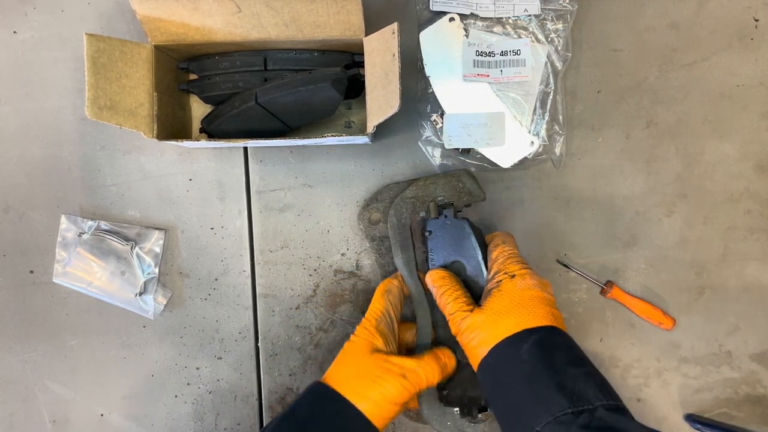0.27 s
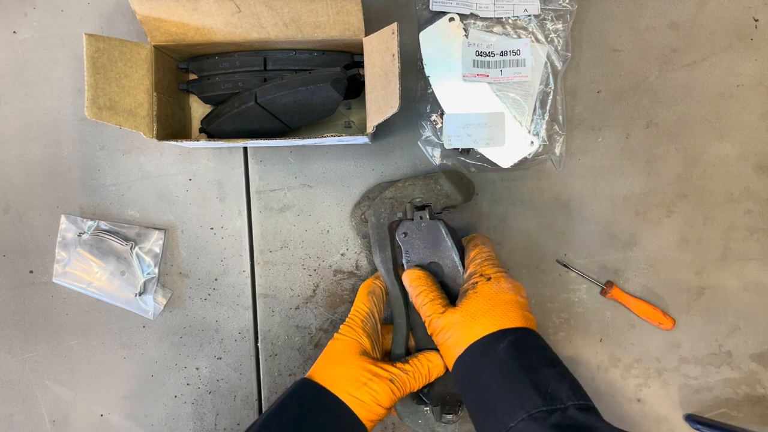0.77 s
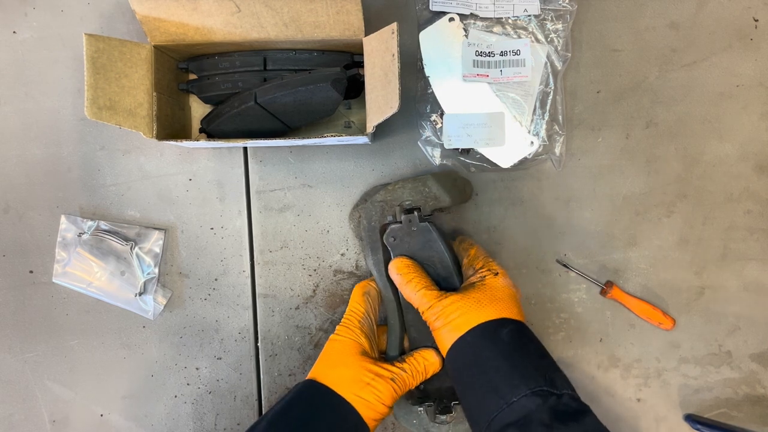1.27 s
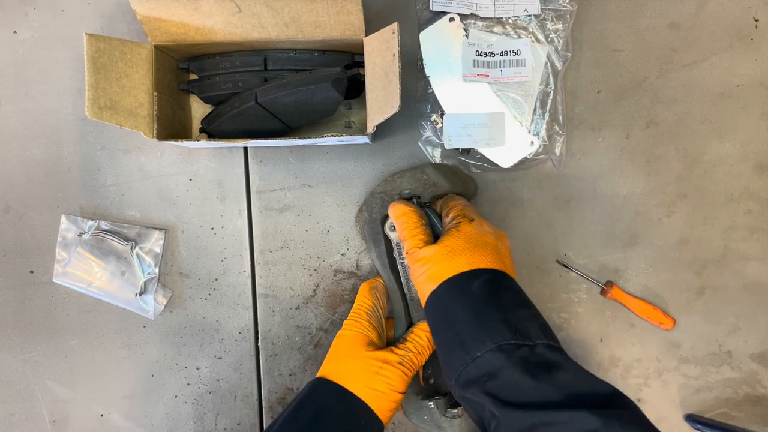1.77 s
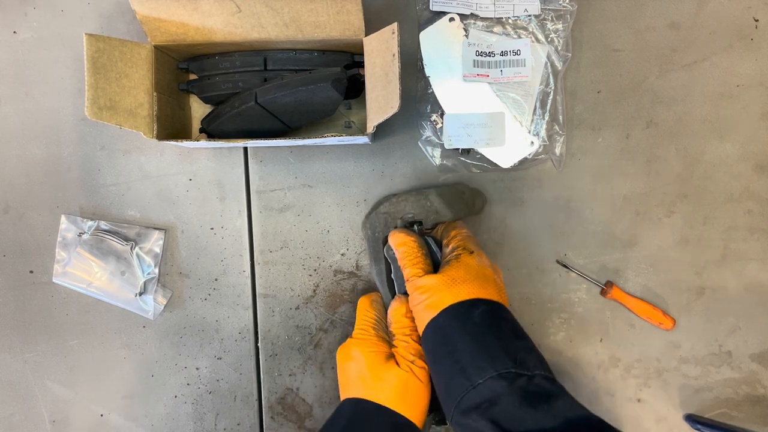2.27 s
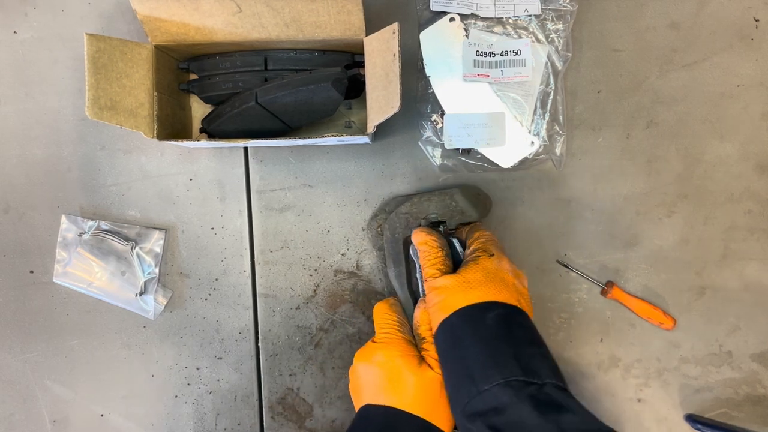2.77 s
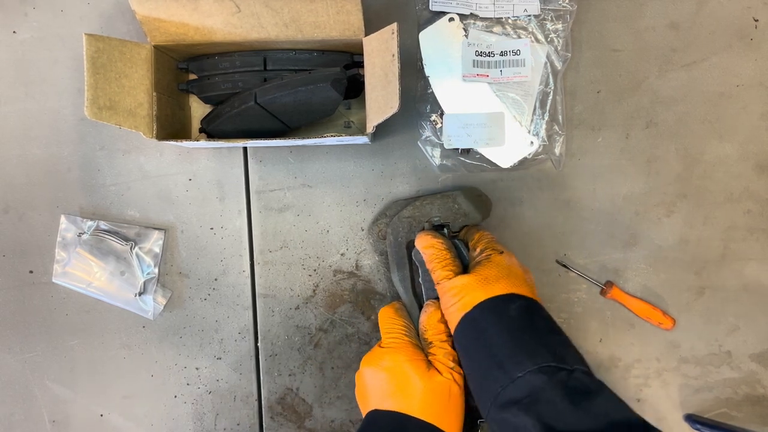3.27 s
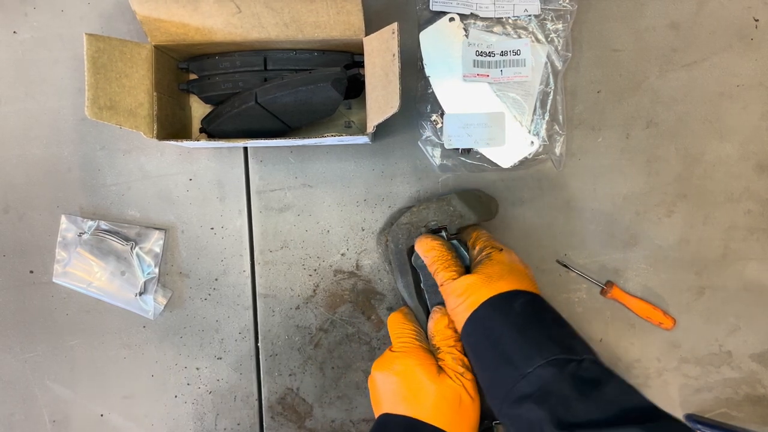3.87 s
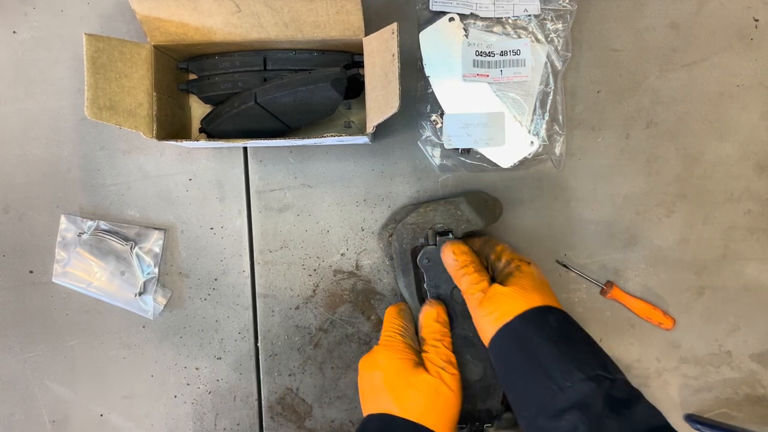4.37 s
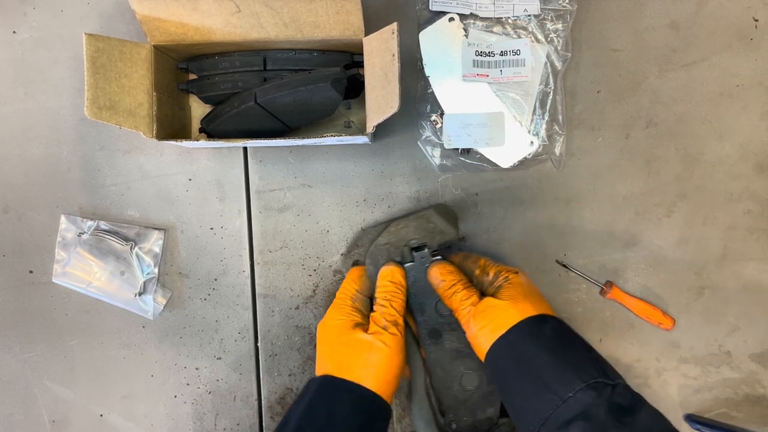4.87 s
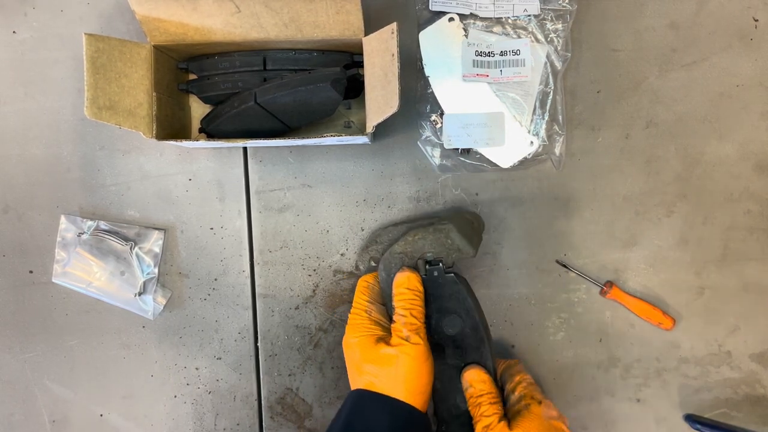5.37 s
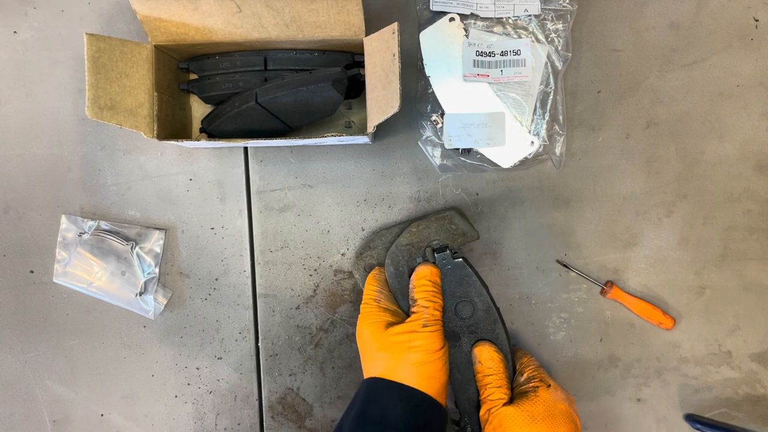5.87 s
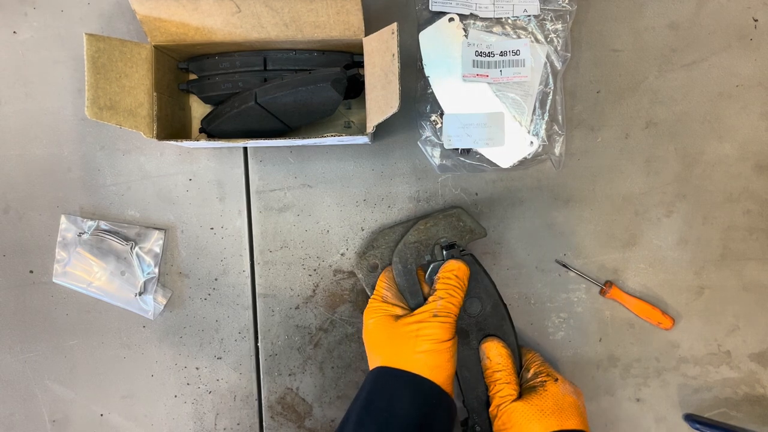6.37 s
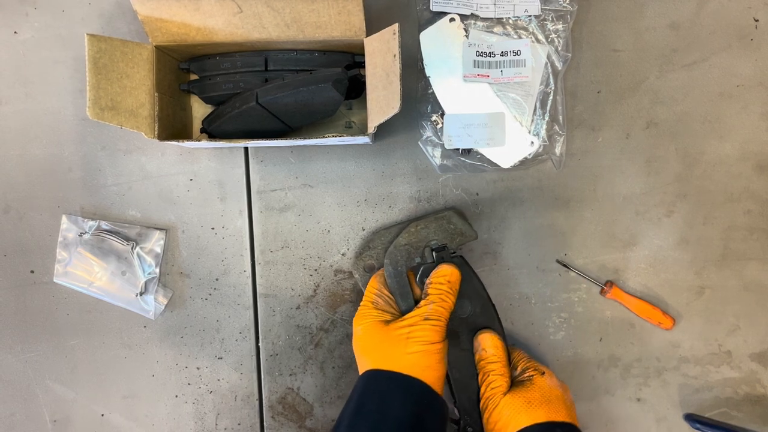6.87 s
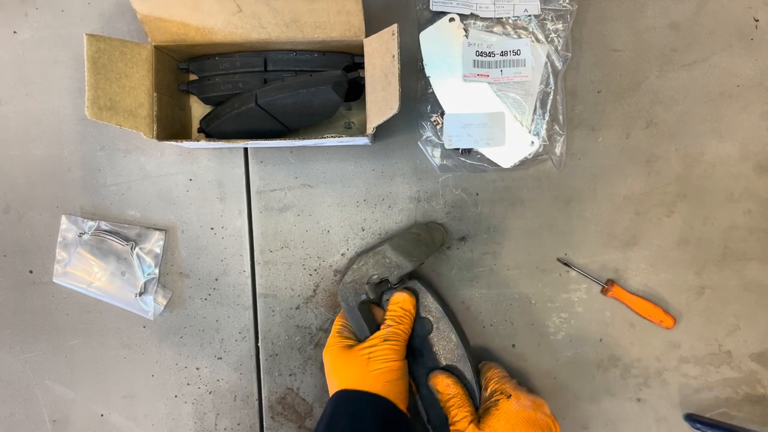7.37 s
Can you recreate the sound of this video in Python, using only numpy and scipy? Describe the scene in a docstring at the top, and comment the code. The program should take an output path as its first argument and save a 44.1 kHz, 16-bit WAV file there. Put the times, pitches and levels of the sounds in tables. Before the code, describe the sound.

In a garage, a steel brake pad is worked into a cast bracket on a hard surface. Gritty scraping and faint squeaky rubs run over a quiet room hum, with light knocks first, then heavier low thumps and metal ticks. A bright clack comes midway, and a rapid hard clatter just after seven seconds. Heard closely in stereo with a soft room echo.

```python
"""A steel brake pad is worked into a cast caliper bracket that lies on a work surface in a garage.
From the start steel and gloves scrape over still-room noise: grains of noise rasp and shake the surface,
some rubs sing as narrow bands, and swipes swell. Light knocks come first, then heavier thumps from 1.4 s,
as decaying surface modes under gritty noise; edges tick and the plate rings, as noise cracks with modes.
A harder clatter comes just after 7 s. A close pair of microphone ports hears it with the garage's echo."""
import sys
import numpy as np
from scipy import signal
from scipy.fft import rfft, irfft, next_fast_len
from scipy.io import wavfile
from scipy.ndimage import uniform_filter1d

SR = 44100
rng = np.random.default_rng(int(sys.argv[2]) if len(sys.argv) > 2 else 0)


def digitize_waveform(pressure):
    """Quantize a signal to 16-bit integers and store it at the path in sys.argv[1].

    Rows of a 2-D input are taken as channels; values are limited to [-1, 1].
    """
    field = np.atleast_2d(pressure).T
    bounded = np.clip(field, -1, 1)
    quanta = np.round(bounded * 32767).astype(np.int16)
    wavfile.write(sys.argv[1], SR, quanta)


N = 336262

# Modes of the work surface, shared by thumps and sliding.
# Each row: nominal frequency in hertz, relative level in dB, decay time as a share of the sound's t60.
SURFACE_MODES = [(52, -38.5, 0.37), (74.5, -15, 0.61), (88.6, 1.5, 0.61), (105.5, 2, 0.73), (127.6, 5, 0.4),
                 (145, 2, 0.63), (164.9, -4, 0.7), (208.9, -10.5, 0.83), (245.7, -4.5, 1.02),
                 (271.7, 5.5, 0.51), (326.6, -3.5, 1.1), (356, -1.5, 0.54), (435.4, -7.5, 1.2),
                 (501.4, -4.5, 1.1), (580, -11.5, 0.87), (751, -17, 2.4), (910, -1.5, 0.44),
                 (994, -11.5, 0.37)]


def amp(db):
    """Level law: 20 dB is a factor of ten in amplitude."""
    return 10 ** (np.asarray(db) / 20)


def evened(x):
    """Normalisation to unit root-mean-square amplitude."""
    return x / np.sqrt(np.mean(x ** 2) + 1e-20)


def read(points, hz):
    """Interpolation of a frequency curve along a logarithmic frequency axis."""
    f, value = np.transpose(points)
    return np.interp(np.log(hz + 1), np.log(f + 1), value)


def add(mix, s, sound):
    """Superposition: adds a sound to the mix from s seconds on."""
    part = mix[round(s * SR):][:len(sound)]
    part += sound[:len(part)]


def shaped(x, gain):
    """Linear filtering: multiplies the spectrum by a gain given as a function of hertz."""
    size = next_fast_len(x.shape[-1])
    spectrum = rfft(x, size) * gain(np.fft.rfftfreq(size, 1 / SR))
    return irfft(spectrum, size)[..., :x.shape[-1]]


def rings(t, hz, db, t60):
    """Modal superposition: a sum of exponentially decaying sines, each silent before its time zero."""
    t = np.maximum(t, 0)
    modes = amp(db - 60 * t / t60) * np.sin(2 * np.pi * hz * t)
    return modes.sum(0)


def resonate(x, hz, width_hz):
    """Resonance by heterodyning: shifts hz to zero, smooths with unit gain, and shifts back."""
    turn = np.exp(2j * np.pi * hz * np.arange(len(x)) / SR)
    pole = np.exp(-np.pi * width_hz / SR)
    return 2 * (turn * signal.lfilter([1 - pole], [1, -pole], x / turn)).real


def patchy(x, depth_db):
    """Time-varying spectrum: colour drifts in patches as different spots of the faces touch."""
    z = signal.stft(x, nperseg=512, noverlap=384)[2]
    across_hz = uniform_filter1d(rng.standard_normal(z.shape), 9, axis=0)
    patches = evened(uniform_filter1d(across_hz, 14, axis=1))
    return signal.istft(z * amp(depth_db * patches), nperseg=512, noverlap=384)[1][:len(x)]


def contact(x, tilt_db):
    """Spectral colour of steel contact, tilted by tilt_db per octave about 3 kHz."""
    # Colour of steel contact noise. Each row: frequency in hertz, relative level in dB.
    contact_colour = [(200, 3), (600, 1), (1200, 1), (2000, 2), (3200, 2), (5200, -2.5), (7500, -7),
                      (10500, -7), (13500, -14), (16500, -14.5)]
    return shaped(x, lambda hz: amp(read(contact_colour, hz) + tilt_db * np.log2((hz + 100) / 3000)))


def still_air():
    """Stationary random noise: the still room has a fixed spectrum and a steady level."""
    # Spectrum of the still room. Each row: frequency in hertz, relative level in dB per hertz.
    air_spectrum = [(15, -44.5), (25, -13), (92, 36.5), (256, 27.5), (575, -65), (2840, 5.5), (5280, -59),
                    (7510, -62), (10100, -27), (16000, -70.5)]
    noise = shaped(rng.standard_normal(N), lambda hz: amp(read(air_spectrum, hz)))
    return amp(-59.5) * evened(noise)


def garage(x):
    """Reverberation: taps of random sign decay band by band; the ports differ most in the middle range."""
    # Decay of the garage. Each row: frequency in hertz, t60 in seconds.
    garage_decay = [(80, 0.44), (250, 0.74), (1000, 0.44), (3000, 0.47), (8000, 0.36), (16000, 0.17)]
    taps = np.zeros((2, SR))
    at = np.arange(200, SR - 20, 20) + rng.integers(0, 20, (2, (SR - 201) // 20))
    np.put_along_axis(taps, at, rng.choice([-1., 1.], at.shape), 1)
    hz, t, z = signal.stft(taps, SR, nperseg=512)
    octaves = np.log2((hz[:, None] + 1) / 1700)
    apart = np.clip(.9 * np.exp(-(octaves / 2.2) ** 2), 0, 1)
    z = np.array([z[0], np.sqrt(1 - apart ** 2) * z[0] + apart * z[1]])
    fade = amp(-60 * t / read(garage_decay, hz)[:, None])
    tail = signal.istft(z * fade, SR, nperseg=512)[1]
    return signal.fftconvolve(x[None], tail / np.linalg.norm(tail[0]), axes=1)[:, :N]


def slide():
    """Friction of rough faces: dense grains rasp, and lumpy forcing shakes the surface modes."""
    # Course of the sliding, interpolated between rows. Each row: time in seconds, level of the rumble
    # in the surface in dB, level of the rasp in dB, sharpness from 0 (dull drag) to 1 (scratch).
    slide_course = [(0.0, -51.5, -53.5, 0.033), (0.27, -48, -59.5, 0.58), (0.85, -52.5, -101, 0.37),
                    (1.34, -50, -51.5, 0.53), (1.75, -50.5, -81.5, 1), (2.14, -66, -70.5, 0.17),
                    (2.74, -43.5, -61.5, .2), (3.29, -41, -67, 0.098), (3.73, -47.5, -59.5, .1),
                    (4.0, -40, -108, 0.93), (4.35, -47.5, -55, 0.22), (4.82, -43.5, -52.5, 0.37),
                    (5.45, -62, -71, 1), (5.75, -45, -57, 0.048), (6.42, -58, -63, 0.12),
                    (6.9, -50.5, -53.5, .1), (7.19, -30, -44, 0.053), (7.5, -48, -53.5, 0.37)]
    s, *columns = np.transpose(slide_course)
    rumble_db, rasp_db, sharp = (np.interp(np.arange(N) / SR, s, c) for c in columns)

    catches = evened(uniform_filter1d(rng.standard_normal(N), 500))  # stick and slip
    grain_db = 2.5 * np.minimum(rng.exponential(1, N), 4) + 1.3 * catches
    grains = patchy(rng.standard_normal(N) * amp(grain_db), 4.8)
    bright = np.clip(sharp, 0, 1)
    drag, scratch = evened(contact(grains, -6.0)), evened(contact(grains, 1.0))
    rasp = (1 - bright) * drag + bright * scratch

    t = np.arange(SR // 4) / SR
    hz, db, share = np.transpose(SURFACE_MODES)[:, :, None]
    response = rings(t, hz, db - 10.8 * np.log2(hz / 100), 0.43 * share)
    rocking = evened(uniform_filter1d(rng.standard_normal(N), 1500))  # the parts rock as they drag
    bumps = rng.standard_normal(N) * amp(4.8 * rocking)
    rumble = evened(signal.oaconvolve(bumps, response)[:N])
    return amp(rumble_db) * rumble + amp(rasp_db) * rasp


def swipe(length, db, tilt_db):
    """Broadband friction: contact noise of glove or steel under a brief swell."""
    count = round(length * SR)
    noise = contact(rng.standard_normal(SR // 4), tilt_db)[:count]
    return amp(db) * evened(noise) * signal.windows.tukey(count, .7)


def squeak(length, hz, db):
    """Resonant friction: uneven slips excite one band while the rub swells and fades."""
    width_hz = 400  # of each of two resonances in series
    count = round(length * SR)
    noise, slips = rng.standard_normal((SR // 2, 2))[:count].T
    drive = noise * amp(6.4 * evened(uniform_filter1d(slips, 300)))
    band = resonate(resonate(drive, hz, width_hz), hz, width_hz)
    return amp(db) * evened(band) * np.hanning(count)


def click(modes, db, tilt_db, pitch_hz, focus_db, ring_db, grip_db):
    """Impact with damping: a crack with a gritty wake excites modes near a pitch; grip speeds their decay."""
    t = np.arange(SR // 3) / SR
    hz, mode_db, t60 = np.transpose(modes)[:, :, None]
    onset = np.minimum(t / 0.00071, 1)
    wake = amp(-60 * t / .009) + amp(-13. - 60 * t / .04)
    crack = contact(rng.standard_normal(len(t)), tilt_db) * wake * onset
    struck_db = mode_db - abs(focus_db * np.log2(hz / pitch_hz))  # focus in dB per octave off the pitch
    gripped_t60 = 1 / (1 / t60 + amp(grip_db))
    ring = rings(t, hz, struck_db, gripped_t60)
    return amp(db) * (1.155 * crack / abs(crack).max() + amp(ring_db) * ring * onset)


def tick(db, tilt_db, pitch_hz):
    """Impact on a cast body: an edge catches the bracket and excites its short-lived modes."""
    # Modes of the cast bracket.
    # Each row: frequency in hertz, relative level in dB, t60 in seconds when free.
    bracket_modes = [(775, -6, 0.043), (910, -7.5, 0.031), (1066, -2, 0.041), (1397, -5.5, 0.026),
                     (1645, -0.5, 0.017), (1943, -5.5, 0.045), (2234, -8, 0.015), (2884, -3, 0.082),
                     (3410, -15.5, 0.075), (3850, -23.5, 0.033)]
    return click(bracket_modes, db, tilt_db, pitch_hz, focus_db=8., ring_db=-5., grip_db=26.)


def strike(db, pitch_hz, focus_db, grip_db):
    """Impact on a plate: the pad's steel takes a blow and rings as its grip allows."""
    # Modes of the pad's plate.
    # Each row: frequency in hertz, relative level in dB, t60 in seconds when free.
    pad_modes = [(620, -6, .1), (1690, -1, .1), (1995, 0, .1), (3115, -9, .12), (3850, -12, .03),
                 (5210, -4, .35), (6090, -22, .12), (10000, -14, .02), (11500, -8, .02), (12620, -18, .04)]
    return click(pad_modes, db, 8.5, pitch_hz, focus_db, ring_db=-3, grip_db=grip_db)


def thump(db, pitch_hz, grit_db):
    """Dispersion of bending waves: surface modes near the pitch ring, low ones late, with grit on top."""
    t = np.arange(SR // 2) / SR
    t60 = 0.19 * (153.5 / pitch_hz) ** 0.36  # 0.19 s at 153.5 Hz; lower knocks ring longer
    hz, mode_db, share = np.transpose(SURFACE_MODES)[:, :, None]
    late = t - 0.0589 / np.sqrt(hz) + .002
    rise_db = 20 * np.log10(1 - np.exp(-np.maximum(late, 0) * hz * 0.57) + 1e-9)
    octaves = np.log2(hz / pitch_hz)
    near_db = -11. * np.maximum(octaves, 0) + 3.4 * np.minimum(octaves, 0)
    varied_hz = hz * rng.normal(1, 0.034, hz.shape)
    body = rings(late, varied_hz, mode_db + near_db + rise_db, t60 * share)

    grit = evened(patchy(contact(rng.standard_normal(len(t)), -6.5), 3.2))  # lumpy as the parts settle
    grit_rise_s = 0.00085 * amp(-0.47 * db)  # softer knocks rise more slowly
    grit = grit * amp(-60 * t / (1.51 * t60)) * np.minimum(t / grit_rise_s, 1)
    return amp(db) * (body / abs(body).max() + amp(grit_db) * grit)


def scene():
    """Superposition of contact sounds, still air and the garage's reverberation."""
    # The bracket knocks on the surface. Each row: start in seconds, level in dB,
    # pitch of the contact in hertz, grit level over the thump in dB.
    thumps = [(0.316, -29, 158, -9.5), (0.346, -26, 150, -17.5), (0.385, -33.5, 145, -65),
              (0.5, -36, 85, -14.5), (0.577, -24, 108, -18), (0.658, -29.5, 160, -17),
              (0.718, -35, 151, -11), (0.933, -30.5, 236, -10), (1.159, -31, 154, -12),
              (1.391, -11, 131.5, -17), (1.641, -34, 245, -13.5), (2.117, -14, 143, -19),
              (2.167, -22, 89, -16.5), (2.251, -25, 288, -11), (2.488, -12.5, 141, -12),
              (2.569, -38.5, 260, 3), (2.934, -20.5, 178, -13.5), (3.134, -27.5, 267, -14.5),
              (3.403, -27, 197, -18), (3.469, -28.5, 111, -9), (3.696, -19.5, 75, -25),
              (3.936, -16.5, 78, -31), (4.579, -26, 108, -11.5), (4.62, -24.5, 163, -10),
              (4.785, -25.5, 83.6, -5), (4.899, -31.5, 77.5, -21), (4.949, -32, 62.7, -7.5),
              (5.551, -13, 140, -14), (5.806, -28.5, 162, -12.5), (5.951, -36, 145, -18),
              (6.077, -28.5, 132, -10.5), (6.31, -33, 110, -26.5), (6.48, -39, 305, -2.5),
              (6.512, -24.5, 139, -18), (6.56, -26.5, 334, -13), (6.66, -23.5, 243, -4.5),
              (6.818, -27, 107, -7), (6.899, -31, 159, -13.5), (7.02, -23, 271, -7),
              (7.058, -11.5, 146, -12.5), (7.082, -13.5, 165, -11), (7.114, -11.5, 162, -6),
              (7.149, -12, 162, -4.5), (7.175, -11.5, 141, -8), (7.211, -33, 71.4, -21),
              (7.269, -25.5, 266, 3), (7.485, -38, 267.7, -18)]
    # Rubs that sing in one band. Each row: start in seconds, length in seconds,
    # centre frequency in hertz, level in dB.
    squeaks = [(0, 0.055, 2000, -65.5), (0.107, 0.037, 2010, -59), (0.258, 0.18, 2700, -57.5),
               (0.865, 0.039, 1970, -67), (0.956, 0.057, 1860, -61), (1.093, 0.16, 1840, -60),
               (1.265, 0.12, 2420, -52.5), (2.131, 0.12, 2770, -62), (4.269, 0.099, 2780, -57.5),
               (4.558, 0.16, 2910, -57.5), (4.8, 0.3, 2890, -62), (5.187, 0.16, 1630, -60.5),
               (7.482, 0.13, 2200, -51)]
    # Short swipes of glove or steel. Each row: start in seconds, length in seconds,
    # level in dB, treble tilt in dB per octave.
    swipes = [(0.092, 0.16, -58.5, 2), (0.163, 0.024, -46.5, 7.5), (1.188, 0.035, -60, 0),
              (1.27, 0.14, -59, -5), (1.884, 0.1, -64, 1), (2.925, 0.14, -52, -3.5),
              (3.333, 0.073, -44, -5), (3.396, 0.088, -40, -6), (4.457, 0.062, -56.5, 3),
              (4.629, 0.097, -59, 0.5), (5.041, 0.11, -58.5, 6), (5.209, 0.081, -58, 4),
              (5.384, 0.063, -61.5, 1), (5.603, 0.048, -45, -2), (5.927, 0.053, -56.5, 2.5),
              (6.678, 0.048, -45.5, -2), (6.746, 0.045, -35.5, -6.5), (6.835, 0.049, -43.5, -4.5),
              (6.926, 0.045, -35.5, -8), (7.084, 0.041, -25.5, -3.5), (7.277, 0.084, -43, -22)]
    # Edges tick on the bracket. Each row: start in seconds, level in dB,
    # treble tilt in dB per octave, favoured pitch in hertz.
    ticks = [(0.7228, -37.5, 1, 1160), (0.7858, -37.5, -3, 1910), (0.933, -39.5, -13, 961),
             (1.175, -58, 1, 1850), (1.3417, -50, -9, 2500), (1.3906, -24.5, -8, 930),
             (1.6553, -40.5, -5, 1410), (2.065, -40.5, -1.5, 2830), (2.1177, -23, -10.5, 1140),
             (2.2503, -37, -3.5, 920), (2.4848, -36.5, 0, 937), (2.9221, -31, -4, 1170),
             (2.9372, -30, -2.5, 902), (3.1306, -34.5, -8.5, 969), (3.1945, -35, -5, 1420),
             (3.3509, -44, -1, 1140), (3.596, -38.5, -6.5, 926), (3.73, -43.5, -9, 1220),
             (3.89, -44, 11, 1554), (3.935, -22.5, -0.5, 1800), (4.2975, -43, 1, 2780),
             (4.6498, -36, -1, 1070), (4.784, -21, -1, 1290), (4.789, -24, 0.5, 3460),
             (5.2683, -39.5, 0, 1600), (5.555, -32, 0.5, 1210), (5.577, -34.5, 6, 902),
             (5.81, -31, -8.5, 1040), (6.04, -54, 8, 2900), (6.075, -37, -19, 1070), (6.318, -50, -4, 1900),
             (6.5626, -37.5, -6, 1280), (6.6554, -28, -5.5, 1050), (6.8197, -47, -11, 1060),
             (7.016, -31, -7, 1770), (7.0998, -9, -6.5, 1080), (7.1064, -14, -7.5, 1000),
             (7.1145, -5.5, -11, 970), (7.1372, -46, 12, 1010), (7.1688, -20.5, -3.5, 907),
             (7.1742, -16.5, -5, 2930), (7.184, -31, 0, 1000), (7.2103, -26, -3, 1510),
             (7.448, -38, -1.5, 1710)]
    # The pad's plate strikes the bracket. Each row: start in seconds, level in dB, favoured pitch in hertz,
    # focus in dB per octave, grip as added decay rate in dB re 1 per second.
    strikes = [(.5045, -48, 5200, 3, 20), (0.516, -53, 2200, 11, 20), (0.577, -43.5, 2000, 2, 3),
               (.5955, -36.5, 1995, 35, 13), (.5928, -35, 3250, 11, 3), (3.695, -15, 5200, 1.25, 33.5),
               (7.054, -22, 2030, 6.5, 18), (7.0609, -15.5, 2040, 25, 16), (7.0732, -21, 2000, 24, 16)]
    bench = slide()
    sources = ((thump, thumps), (squeak, squeaks), (swipe, swipes), (tick, ticks), (strike, strikes))
    for source, table in sources:
        for s, *row in table:
            add(bench, s, source(*row))
    return bench + still_air() + amp(-10.0) * garage(bench)


def record(dry):
    """Two-port reception: deep bass is cut, ports differ in phase and level, and the band is limited."""
    # Phase between the ports. Each row: frequency in hertz, lead of the left port in radians.
    port_lead = [(0, 0), (1000, -.4), (2000, .1), (2800, 1.1), (4300, .8), (4900, -.1), (7400, 3.05),
                 (7900, 3.2), (11100, 6.35), (14200, 9.4), (16500, 11)]
    # Level between the ports. Each row: frequency in hertz, left minus right in dB.
    port_balance = [(60, 0), (500, 1), (1200, .5), (2500, -.5), (15000, -.5)]
    half = np.array([[.5], [-.5]])  # each port takes half the difference

    def port_gain(hz):
        """Complex transfer function of each port."""
        lead = np.interp(hz, *np.transpose(port_lead))
        return np.exp(1j * half * lead) * amp(half * read(port_balance, hz))

    dry = signal.sosfilt(signal.butter(4, 50., "high", fs=SR, output="sos"), dry)
    pair = shaped(dry, port_gain)
    band_limit = signal.firwin(511, 16400, window=("kaiser", 9), fs=SR)  # low-pass edge in hertz
    return signal.oaconvolve(pair, band_limit[None], "same")


dry = scene()
out = record(dry)
digitize_waveform(out)
```